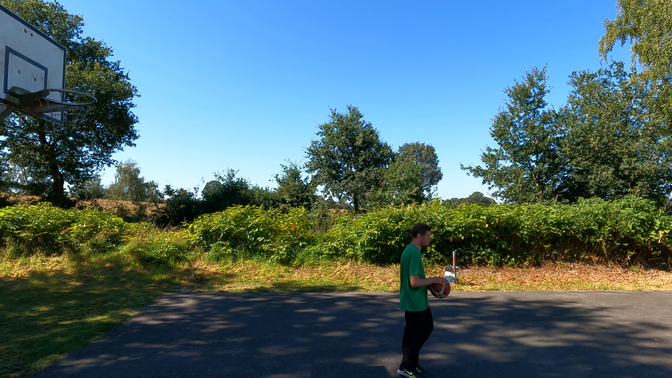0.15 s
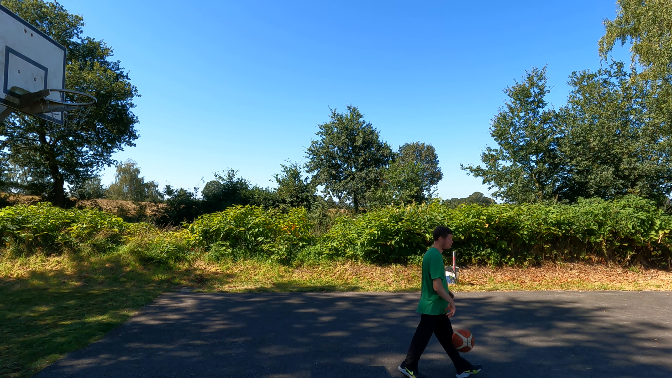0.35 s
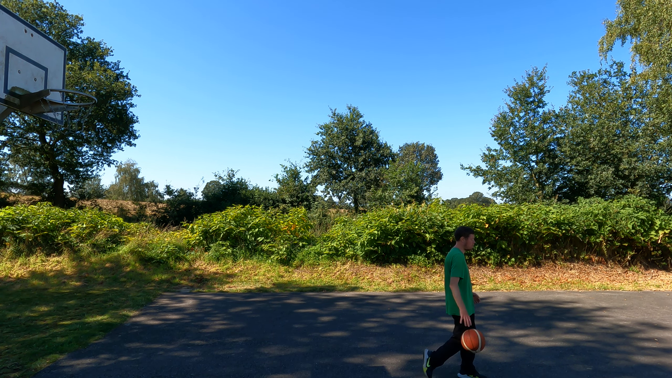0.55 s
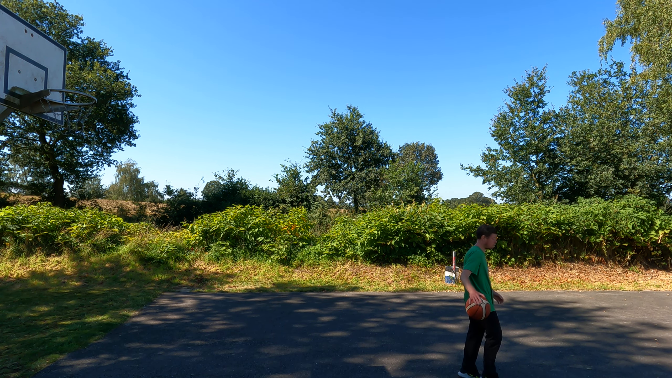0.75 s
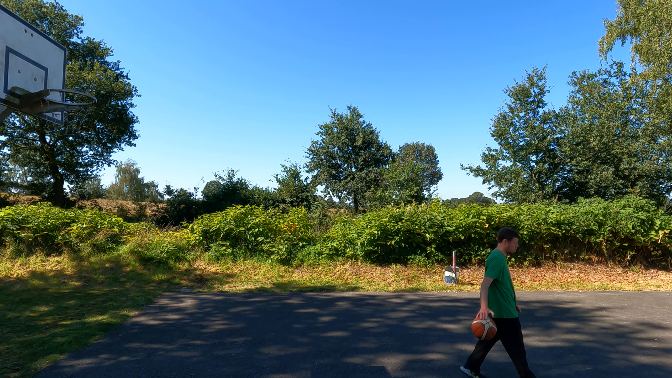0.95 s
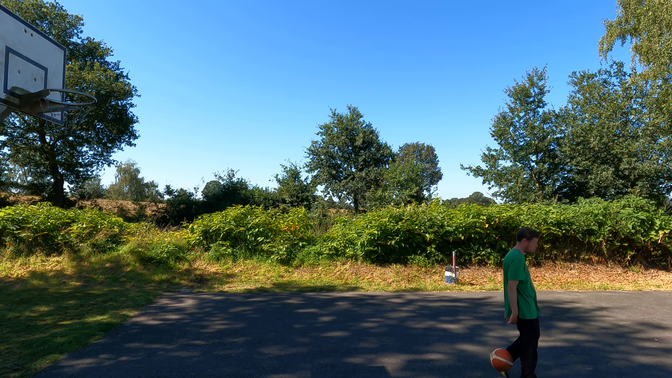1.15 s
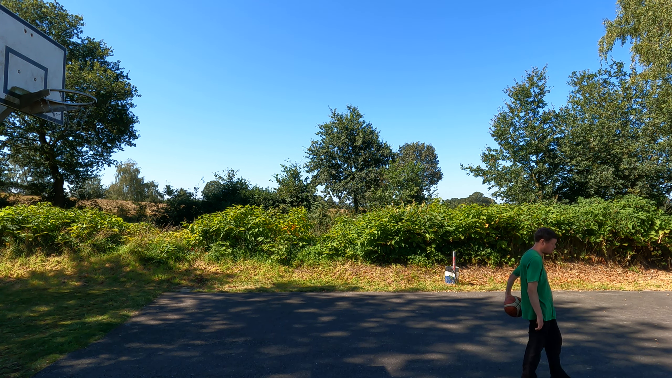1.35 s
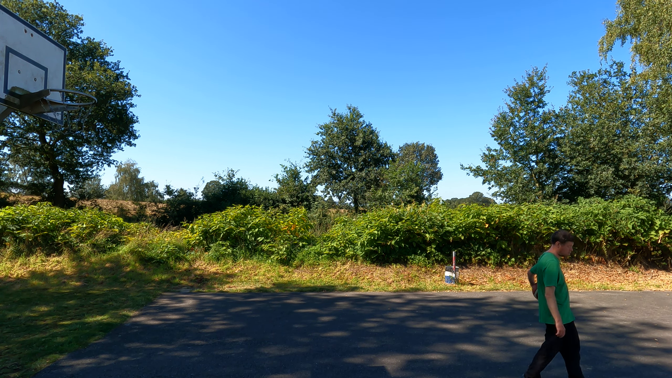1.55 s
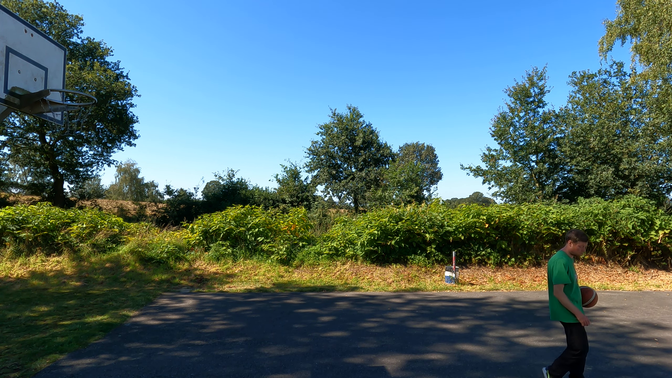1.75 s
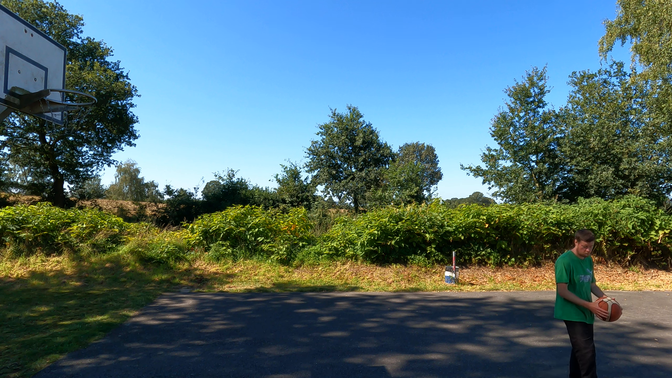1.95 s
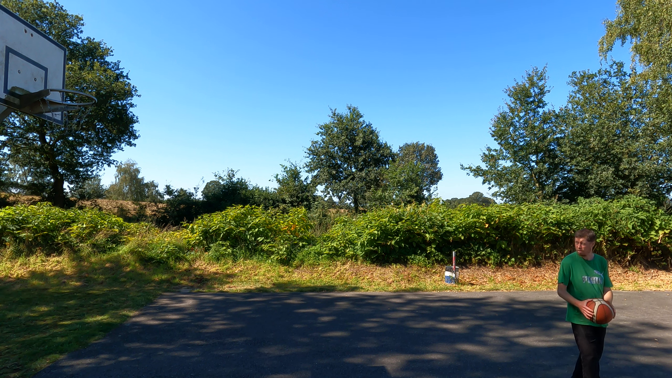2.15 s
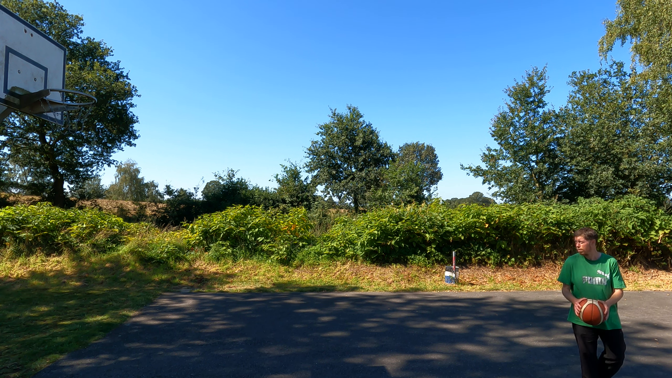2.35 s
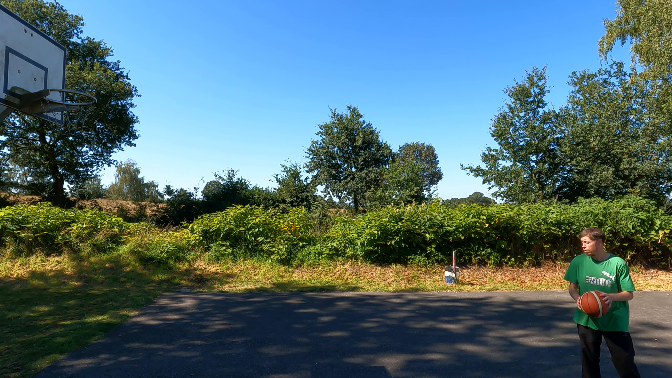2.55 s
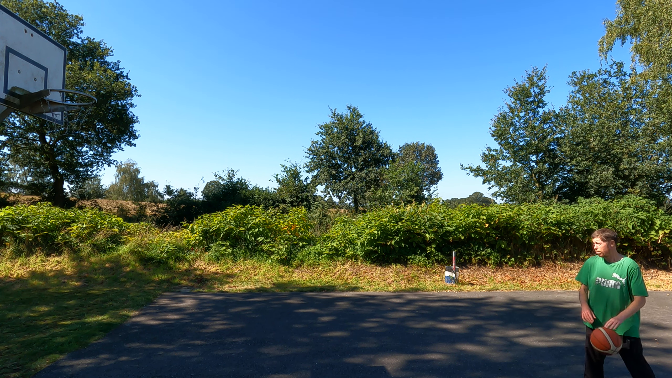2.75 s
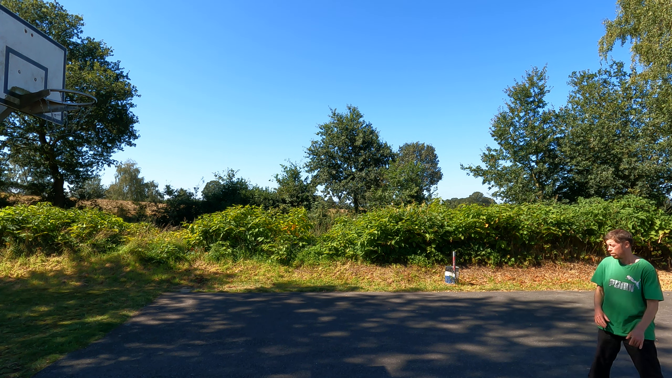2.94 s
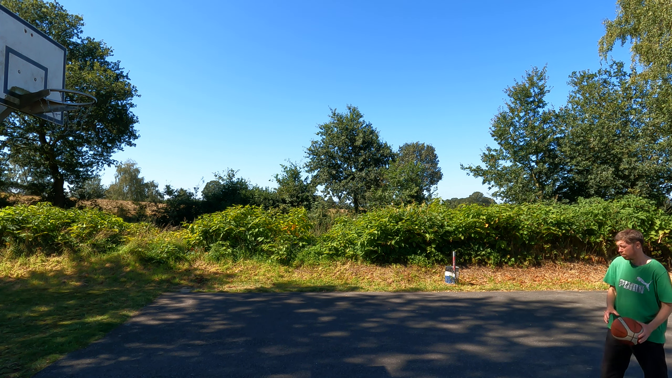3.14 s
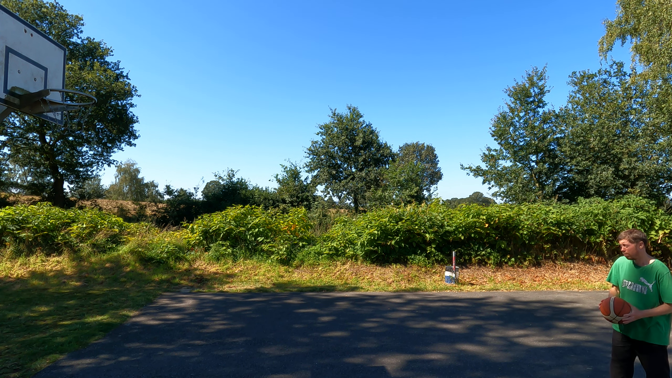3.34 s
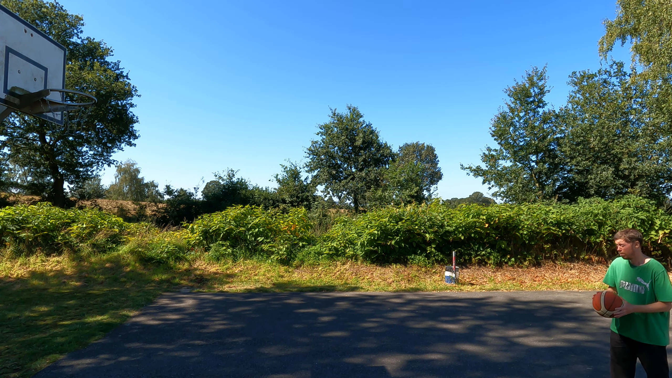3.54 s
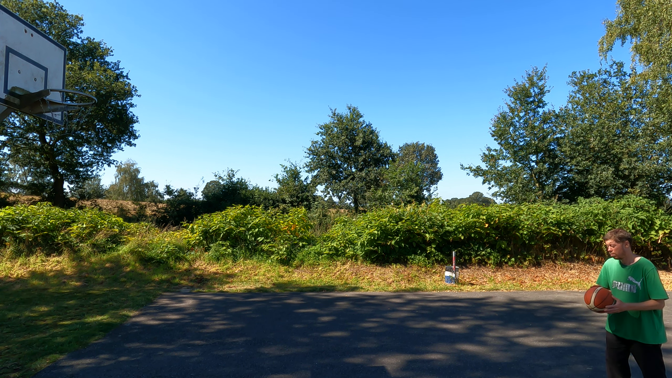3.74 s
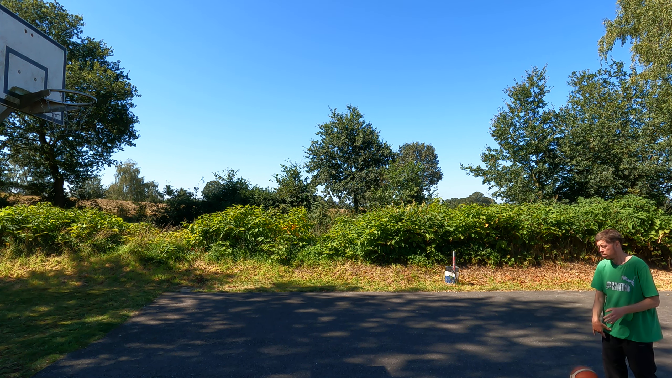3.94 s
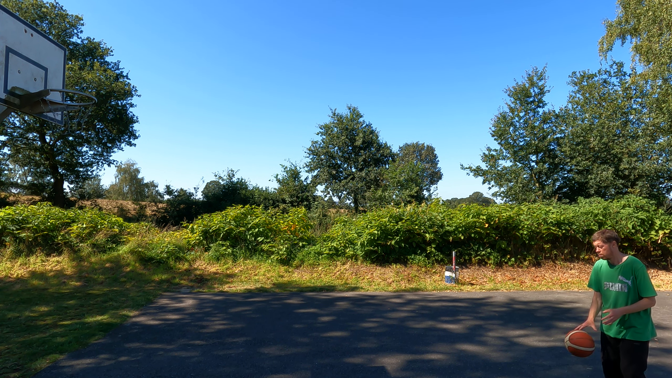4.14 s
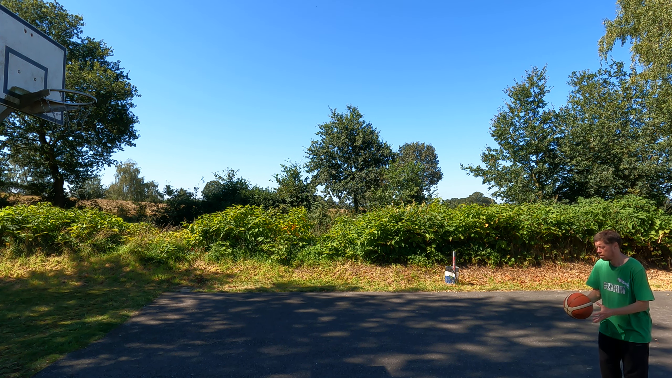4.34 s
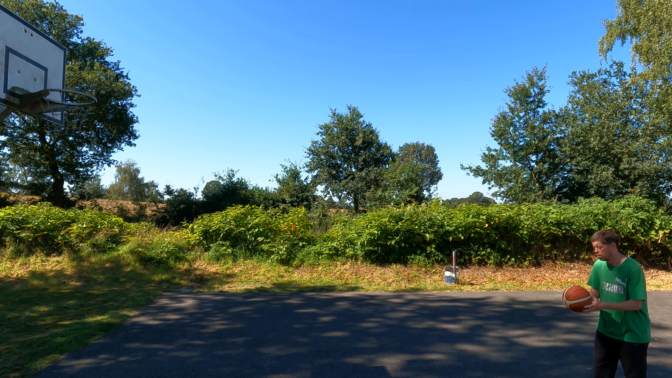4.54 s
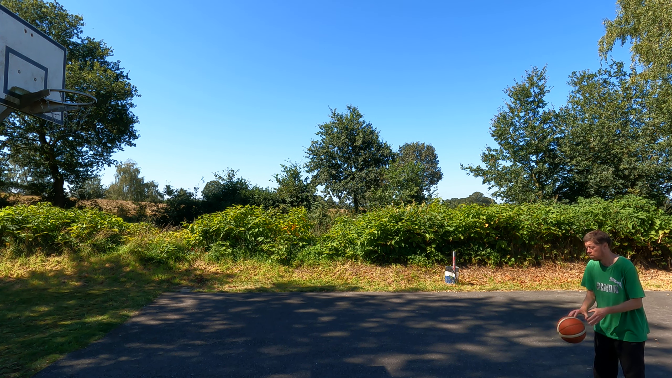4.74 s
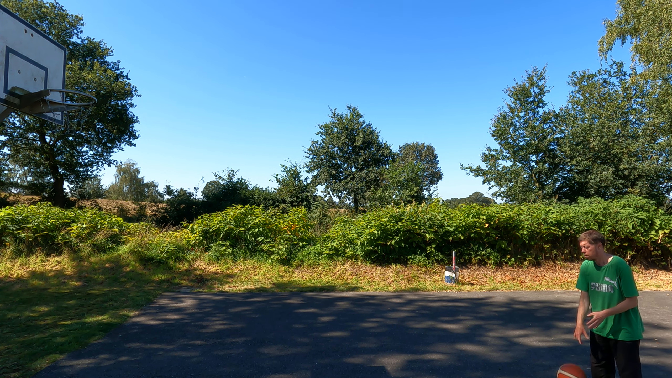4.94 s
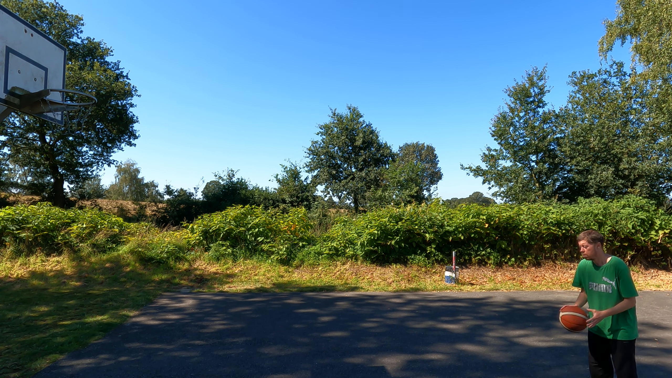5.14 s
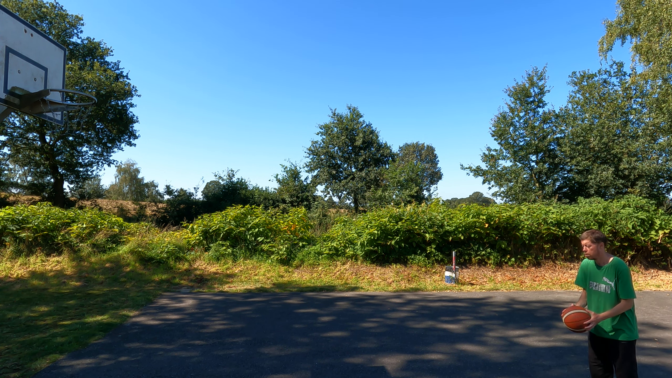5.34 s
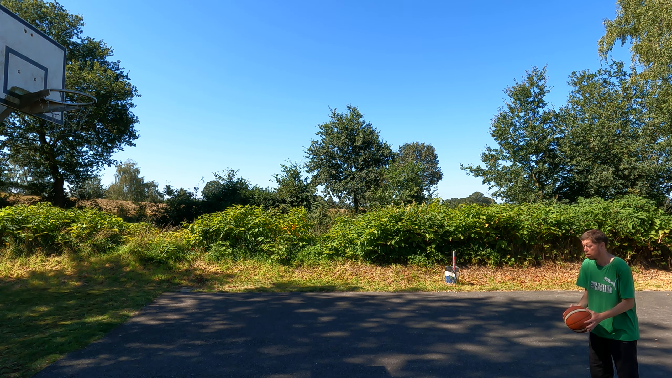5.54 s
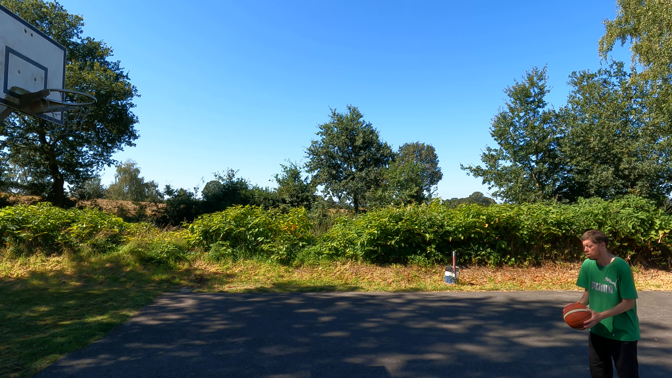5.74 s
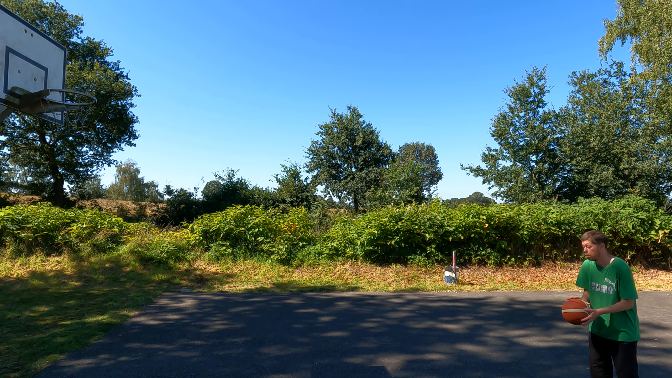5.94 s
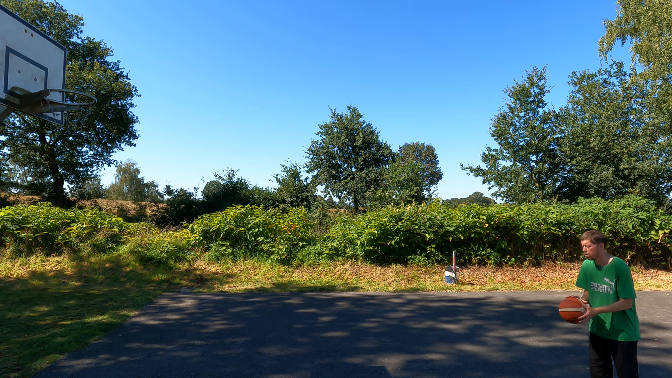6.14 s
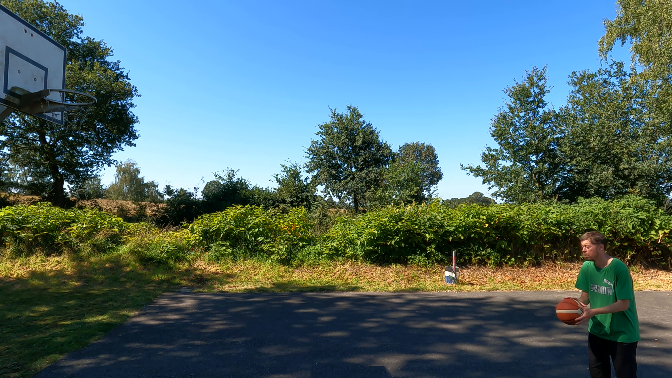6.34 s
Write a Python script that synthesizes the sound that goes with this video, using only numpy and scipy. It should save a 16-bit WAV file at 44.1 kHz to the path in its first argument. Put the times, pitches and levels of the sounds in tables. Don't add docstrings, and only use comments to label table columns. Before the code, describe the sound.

Sharp, punchy basketball bounces on an open asphalt court, scattered back by trees, with gritty footsteps, hand brushes and quiet distant traffic beneath.

```python
import sys
import numpy as np
from scipy import signal
from scipy.fft import rfft, irfft
from scipy.io import wavfile
from scipy.ndimage import uniform_filter1d

SR = 44100
rng = np.random.default_rng(int(sys.argv[2]) if len(sys.argv) > 2 else 0)


def decibels_to_gain(level_db):
    exponent = np.asarray(level_db, float) / 20
    return 10 ** exponent


def to_wav(s):
    ch = np.atleast_2d(s).T
    pcm = np.round(np.clip(ch, -1, 1) * 32767)
    wavfile.write(sys.argv[1], SR, pcm.astype(np.int16))


N = 281799


def evened(x):
    return x / np.sqrt(np.mean(x ** 2) + 1e-20)


def read(points, hz, column=1):
    table = np.transpose(points)
    return np.interp(np.log(hz + 1), np.log(table[0] + 1), table[column])


def add(mix, s, sound):
    part = mix[round(s * SR):][:len(sound)]
    part += sound[:len(part)]


def noise(spectrum, size=N):
    hz = np.fft.rfftfreq(size, 1 / SR)
    return evened(irfft(rfft(rng.standard_normal(size)) * decibels_to_gain(read(spectrum, hz)), size))


def burst(spectrum, db, t60, rise_s=0.00039):
    t = np.arange(2048) / SR
    return noise(spectrum, size=2048) * decibels_to_gain(db - 60 * t / t60) * np.minimum(t / rise_s, 1)


# frequency in Hz, density in dB per Hz.
WASH_COLOUR = [(88, -8), (150, -2), (212, -10), (316, -15), (463, -16.5), (580, -16), (793, -14),
               (911, -11.5), (1100, -10), (1560, -16.5), (2170, -25), (2670, -26.5), (3850, -36),
               (7700, -41.5), (9480, -53.5), (12300, -101), (20900, -120)]
# time in seconds, level in dB.
WASH_LEVEL = [(0.0, -60), (0.36, -60), (0.84, -59.5), (1.05, -61), (1.42, -59), (1.81, -61.5),
              (3.22, -59.5), (3.52, -62), (3.98, -61), (4.2, -58.5), (4.52, -61.5), (4.82, -61),
              (5.27, -60.5), (5.5, -62), (6.39, -61.5)]
# frequency in Hz, density in dB per Hz.
RUMBLE_COLOUR = [(8.8, -55), (15, -28.5), (39, -3), (59, -2), (72, -1.5), (87, -14.5), (107, -10),
                 (156, -24), (260, -39.5), (340, -66), (570, -120)]
# time in seconds, level in dB.
RUMBLE_LEVEL = [(0.0, -45), (0.53, -45), (0.93, -48), (1.99, -45), (2.3, -47.5), (3.04, -45.5), (3.75, -46),
                (3.9, -49.5), (4.55, -48.5), (4.91, -46), (5.09, -45), (5.53, -47), (5.92, -49),
                (6.39, -43.5)]


def field():
    t = np.arange(N) / SR
    wash, rumble = (decibels_to_gain(np.interp(t, *np.transpose(curve))) for curve in (WASH_LEVEL, RUMBLE_LEVEL))
    return np.array([decibels_to_gain(5.0) * wash * noise(WASH_COLOUR) + decibels_to_gain(3.5) * rumble * noise(RUMBLE_COLOUR)
                     for _ in range(2)])


# frequency in Hz, density in dB per Hz.
AIRY_COLOUR = [(9500, -40), (10300, 0), (12600, -1), (13400, -12), (14800, -22), (15500, -50)]


def leaves(db=-111., gust_db=6.):
    gusts = evened(uniform_filter1d(uniform_filter1d(rng.standard_normal(N), 3000), 3000))
    return decibels_to_gain(db + gust_db * gusts) * np.array([noise(AIRY_COLOUR), noise(AIRY_COLOUR)])


# strongest at in seconds, rise in seconds, fall in seconds, hiss in dB, body in dB.
SCUFFS = [(0.002, 0.0079, 0.11, -58, -56), (0.357, 0.01, 0.011, -50.5, -51),
          (0.457, 0.0095, 0.014, -57, -50.5), (.49, 0.027, .02, -61.5, -72), (.508, .02, 0.046, -56, -76),
          (.66, 0.022, 0.13, -63.5, -55.5), (.72, .05, .08, -68, -55.5), (0.9, 0.011, 0.012, -50, -75),
          (0.964, 0.027, 0.054, -60, -47.5), (1.025, 0.058, 0.068, -53, -68),
          (1.055, 0.044, 0.034, -54, -58), (1.32, 0.027, 0.11, -57.5, -52), (1.55, 0.013, 0.033, -64, -74),
          (1.585, 0.024, 0.077, -63, -59.5), (1.755, 0.024, 0.077, -66.5, -75),
          (2.11, 0.011, .012, -59.5, -62), (2.166, 0.028, 0.046, -60.5, -53.5),
          (2.85, 0.025, 0.083, -64, -65), (3.16, 0.082, 0.16, -63.5, -56.5), (4.22, 0.023, 0.15, -58, -59),
          (4.347, 0.023, 0.026, -52, -50), (4.56, .015, 0.059, -72, -62), (4.83, 0.041, 0.12, -77, -73),
          (5.103, 0.029, .12, -58.5, -50),
          (.825, .006, .006, -66, -80),
    (1.11, .04, 0.19, -67.5, -70),
    (3.225, .008, .008, -56, -62),
    (3.36, 0.083, 0.078, -70, -77),
    (4.26, 0.034, .06, -70, -61),
    (4.93, .006, .006, -70, -85),
    (5.215, .015, 0.032, -67, -66),
]
# frequency in Hz, density in dB per Hz.
HISS_COLOUR = [(2000, -10.5), (3400, 3), (3720, -11.5), (4470, -3.5), (6470, -7), (7420, -5.5),
               (9480, -18.5), (12300, -66), (20900, -120)]
# frequency in Hz, density in dB per Hz.
BODY_COLOUR = [(500, -14), (800, 7), (1400, 6), (2200, 2), (3200, 3), (3900, -67)]


def scuffs(grain_db=3.0, air_db=-31):
    grains = decibels_to_gain(grain_db * evened(uniform_filter1d(rng.standard_normal(N), 60)))
    hiss, body, air = (evened(grains * noise(c)) for c in (HISS_COLOUR, BODY_COLOUR, AIRY_COLOUR))
    edge_db = -18.5
    t, bright, dull = np.arange(N) / SR, np.zeros(N), np.zeros(N)
    for s, rise, fall, hiss_db, body_db in SCUFFS:
        near = slice(max(round((s - 2 * rise) * SR), 0), round((s + 2 * fall) * SR))
        u = t[near] - s
        drop = np.where(u < 0, abs(u / rise) ** 2.14, abs(u / fall) ** 0.85)
        pressure = decibels_to_gain(2 * edge_db * drop)
        bright[near] += decibels_to_gain(2 * hiss_db) * pressure
        dull[near] += decibels_to_gain(2 * body_db) * pressure
    return np.sqrt(bright) * (hiss + decibels_to_gain(air_db) * air) + np.sqrt(dull) * body


# start in seconds, bright level in dB, dull level in dB, dull pitch in Hz, t60 in seconds.
TICKS = [(0.0727, -53, -55, 1240, 0.034), (0.178, -59.5, -59, 1290, 0.024), (0.4299, -34, -35, 1670, 0.016),
         (0.91, -41, -60, 2150, 0.0092), (0.9532, -62.5, -30.5, 1470, 0.012),
         (0.959, -50, -30, 1550, 0.017), (0.9745, -60, -60, 1570, 0.044), (1.544, -60, -57, 1310, 0.016),
         (1.56, -51, -60, 1250, 0.022), (1.881, -61, -61, 1550, 0.026), (2.1843, -36.5, -39, 2230, 0.01),
         (2.8738, -43, -45, 1260, 0.018), (3.006, -51, -76, 1260, 0.0082), (3.0914, -62, -37, 1300, 0.023),
         (3.1622, -36, -61, 1240, 0.012), (3.234, -37, -31.5, 2210, 0.0095),
         (3.266, -47.5, -60, 1300, 0.012), (4.2418, -58, -51, 1400, 0.015),
         (4.5497, -55.5, -50, 1240, 0.053), (5.3353, -60.5, -51, 2160, 0.0069),
         (6.323, -52.5, -57, 1277, 0.015)]


def ticks():
    out, t = np.zeros(N), np.arange(2048) / SR
    for s, bright_db, dull_db, hz, t60 in TICKS:
        knock = decibels_to_gain(dull_db - 60 * t / t60) * np.minimum(t / 0.0011, 1) * np.sin(2 * np.pi * hz * t)
        add(out, s, burst(HISS_COLOUR, bright_db - 6, t60) + knock)
    return out


def push(db, hz=100.1, second=0.23, third=0.098, rise_s=0.0018, end_s=0.01535, fall_s=0.00091):
    t = np.arange(1800) / SR
    angle = 2 * np.pi * hz * (t - .0051)
    shape = np.clip((t - .0008) / rise_s, 0, 1) / (1 + np.exp((t - end_s) / fall_s))
    return decibels_to_gain(db) * shape * (np.sin(angle) + second * np.sin(2 * angle) + third * np.sin(3 * angle))


def slap(db, width_s=0.00011, before=0.1):
    u = (np.arange(200) / SR - .001) / width_s
    return decibels_to_gain(db) * (u * np.exp((1 - u ** 2) / 2) + before * np.exp(-(u + 8.3) ** 2 / 2))


def snap(db, first_hz, last_hz, t60, glide_s=0.0018):
    t = np.arange(3000) / SR
    turns = last_hz * t + (first_hz - last_hz) * glide_s * (1 - np.exp(-t / glide_s))
    return decibels_to_gain(db - 60 * (t / t60) ** 2.04) * np.minimum(t / 0.0001, 1) * np.sin(2 * np.pi * turns)


def knock_off(db, hz, length):
    t = np.arange(0, length, 1 / SR)
    swell = np.sin(np.pi * (t / length) ** 0.47) ** 2
    return decibels_to_gain(db) * swell * (np.sin(2 * np.pi * hz * t) + 0.31 * np.sin(2 * np.pi * 0.666 * hz * t))


BOUNCE_S = [
    .59997,
    1.2655,
    2.0798,
    3.05967,
    4.15688,
    5.04568,
]
PUSH_DB = [-10, -13, -37.5, -10.5, -10.5, -10.5]
# slap in dB, snap in dB, snap starts in Hz, snap settles in Hz, snap t60 in seconds.
BOUNCES = [(-9.5, -11.5, 1420, 710, 0.0032), (-25, -14, 1700, 706, 0.01), (-50, -54, 1800, 550, 0.014),
           (-7.5, -17, 1460, 550, 0.0092), (-7, -27.5, 1330, 702, 0.034), (-13, -15.5, 2380, 656, 0.019)]
# landing in dB, contact in dB, peeling off in dB, rattle of the shell in dB, tree scatter in dB.
GRIT_LEVELS = [(-21, -58, -43, -24.5, -62.5), (-18, -50.5, -45, -23.5, -64.5),
               (-33.5, -53.5, -60, -32.5, -70), (-22, -56, -54, -25, -58), (-19, -56, -36.5, -23.5, -55.5),
               (-19.5, -47.5, -39, -22.5, -60.5)]
# frequency in Hz, density in dB per Hz.
GRIT_COLOUR = [(1470, -50), (2500, -27), (3230, 11.5), (3780, -24), (4250, -6.5), (5020, -8), (6630, -8),
               (7500, -6.5), (8250, -9), (9480, -28), (12300, -55), (20900, -120)]
# frequency in Hz, density in dB per Hz.
RATTLE_COLOUR = [(200, -87), (400, 10), (800, 2), (1600, 2), (2800, -15), (3500, -20), (5000, -34),
                 (7000, -53), (9000, -45)]
# start in seconds, level in dB, pitch in Hz, length in seconds.
LIFTS = [(0.612, -25.5, 986, 0.0081), (1.276, -25, 920, 0.018), (3.064, -38, 1134, 0.028),
         (4.17, -23, 1010, 0.0064), (5.055, -26.5, 1104, 0.026)]
# start in seconds, level in dB, pitch in Hz, length in seconds.
CATCH = [
    (2.0775, -31, 135, .022),
    (2.081, -35, 400, .016),
    (2.0795, -27, 1150, .012),
    (2.08, -38, 1600, .008),
    (2.09, -43, 420, .03),
    (2.1, -45, 1080, .022),
]


def ball():
    out = np.zeros(N)
    for s, push_db, bounce, grit in zip(BOUNCE_S, PUSH_DB, BOUNCES, GRIT_LEVELS):
        slap_db, *shell = bounce
        land_db, touch_db, peel_db, rattle_db, _ = grit
        add(out, s - .0103, decibels_to_gain(-33.) * (snap(*shell)[:200] + slap(slap_db)))
        add(out, s, push(push_db))
        add(out, s, slap(slap_db) + slap(slap_db - 20.5, width_s=.00005))
        add(out, s + .00036, burst(AIRY_COLOUR, land_db - 33, .0052))
        add(out, s + .0005, burst(GRIT_COLOUR, land_db + 2, .0055))
        add(out, s + .001, snap(*shell))
        add(out, s + .001, burst(RATTLE_COLOUR, rattle_db, .055))
        add(out, s + .0023, burst(GRIT_COLOUR, touch_db + 15.5, .015))
        add(out, s + .0122, burst(GRIT_COLOUR, peel_db, .01))
        add(out, s + .0205, decibels_to_gain(-25.) * slap(slap_db))
    for s, db, hz, length in LIFTS + CATCH:
        add(out, s, knock_off(db, hz, length))
    return out


# frequency in Hz, density in dB per Hz, t60 in seconds.
TREE_COLOUR = [(198, 19.5, 0.96), (400, -8, 1), (900, 12, 0.77), (1770, 13.5, 0.54), (3480, 5.5, 0.85),
               (3740, 3.5, 0.61), (7340, -18.5, 1), (9700, -35, 0.64), (9700, -74, 0.21),
               (12800, -49, 0.23), (13500, -99, 0.33)]


def trees(first_s=0.0078, swell_s=0.084):
    out = np.zeros((2, N))
    for s, (*_, db) in zip(BOUNCE_S, GRIT_LEVELS):
        hz, t, z = signal.stft(rng.standard_normal((2, SR)), SR, nperseg=256)
        swell = np.clip((t - first_s) / swell_s, 0, 1)
        t60 = read(TREE_COLOUR, hz, column=2)[:, None]
        colour_db = read(TREE_COLOUR, hz)[:, None] - 60 * t / t60
        tails = signal.istft(z * swell * decibels_to_gain(colour_db), SR, nperseg=256)[1]
        for side, tail in zip(out, tails):
            add(side, s, decibels_to_gain(db + 1) * evened(tail))
    return out


AIR_HZ = [2152, 2850, 4430]
AIR_T60_S = [.95, .95, .9]
AIR_TRIM_DB = [0, 0, -3]
# lift-off in seconds, then the three modes in dB.
RINGS = [(0.62, -45, -41.5, -59), (1.288, -52, -52.5, -61), (3.078, -53, -55.5, -62),
         (4.178, -53, -41.5, -54), (5.066, -46.5, -54, -70)]
# last null in seconds, time between nulls in seconds, gripped at in seconds,
# rise out of the shadow of ground and legs in seconds; all after lift-off.
SPINS = [(.175, .17, .29, .3), (.18, .09, .33, .3), (.15, .06, .36, .04), (.233, .065, .42, .2),
         (.162, .065, .52, .06)]


def ring(split_hz=11.6, share=0.11, wander_hz=3.74, fade_s=0.0026, settle_s=.06, grip_t60_s=.3):
    out, t = np.zeros(N), np.arange(SR * 3 // 4) / SR
    drift = wander_hz * np.cumsum(evened(uniform_filter1d(rng.standard_normal(N), 1500))) / SR
    for (s, *levels), (null, spacing, grip, clear) in zip(RINGS, SPINS):
        after = np.maximum(t - null, 0)
        facing = np.pi * (np.minimum(t - null, 0) / spacing + (1 - np.exp(-after / settle_s)) / 2)
        lobes = np.sqrt(1 - .995 * np.cos(facing) ** 2)
        choke = np.minimum(t / fade_s, 1) * decibels_to_gain(-60 * np.maximum(t - grip, 0) / grip_t60_s)
        for db, hz, t60, trim_db in zip(levels, AIR_HZ, AIR_T60_S, AIR_TRIM_DB):
            jolt = decibels_to_gain(-3. - 60 * t / .045)
            sustain = lobes * (1 - np.exp(-t / clear)) * decibels_to_gain(-60 * t / t60)
            gain = choke * decibels_to_gain(db + trim_db) * (sustain + jolt)
            turns = hz * t + drift[round(s * SR):][:len(t)]
            twin = share * np.sin(2 * np.pi * (turns + split_hz * t + rng.random()))
            add(out, s, np.sqrt(2) * gain * (np.sin(2 * np.pi * turns) + twin))
    return out


# centre in Hz, width in Hz.
DIPS = [(520, 69), (3720, 560)]


def shaded(x):
    for hz, width_hz in DIPS:
        x = signal.lfilter(*signal.iirnotch(hz, hz / width_hz, SR), x)
    return x


def ports(x, other, pair):
    hz = np.fft.rfftfreq(N, 1 / SR)
    step = decibels_to_gain(read(pair, hz) / 2) * np.exp(1j * read(pair, hz, column=2) / 2)
    same = read(pair, hz, column=3)
    a, b = rfft(x), rfft(other)
    return irfft(np.array([a * step, (same * a + np.sqrt(1 - same ** 2) * b) / step]), N)


# frequency in Hz, left over right in dB, left leads in radians, likeness from 0 to 1.
NEAR = [(80, 0, -.07, 1), (200, -.8, -.09, 1), (450, -3, -.22, 1), (750, -5, -.32, 1), (1700, -5.3, -.8, 1),
        (2500, -6, -1.2, 1), (3400, -5.5, -2.2, 1), (3900, -3, .3, .92), (5500, -2, .2, .93),
        (8000, -.6, 0, .98), (10000, -.6, 0, .96), (12000, -2, 0, .6)]
# frequency in Hz, left over right in dB, left leads in radians, likeness from 0 to 1.
FAR = [(80, -.2, -.05, .995), (200, -1.3, -.08, .88), (450, -4, -.35, .6), (750, -3.3, -.45, .82),
       (1700, -2.2, -.85, .8), (2500, 0, -1.35, .76), (3500, 3.5, -1.9, .65), (4000, 1.5, 0, .62),
       (8000, 2, 0, .62)]


def scene():
    rubbed = scuffs()
    near = shaded(ball()) + ring() + ticks() + rubbed
    wide = decibels_to_gain(-19.0) * np.array([rubbed, np.roll(rubbed, 150)])
    around = field() + trees() + wide + leaves()
    return ports(near, np.roll(near, shift=37), NEAR) + ports(*around, FAR)


def band_limit(x):
    return signal.sosfilt(signal.butter(12, 16500, fs=SR, output="sos"), x)


def record(dry):
    heard = signal.sosfilt(signal.butter(2, 30., "high", fs=SR, output="sos"), dry)
    top = signal.firwin2(127, [0, 12800, 13800, 16000, SR / 2], [1, 1, .3, .15, .1], fs=SR)
    mix = signal.oaconvolve(heard, top[None], "same")
    return band_limit(mix)


dry = scene()
out = record(dry)
to_wav(out)
```